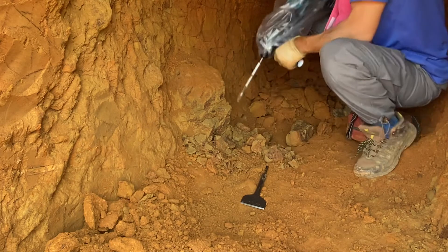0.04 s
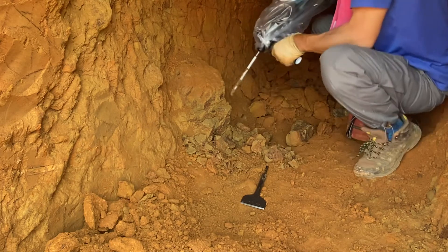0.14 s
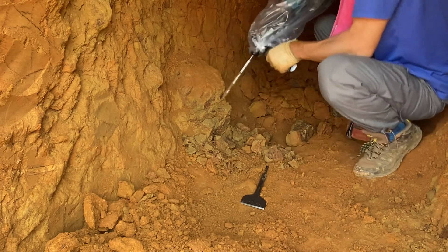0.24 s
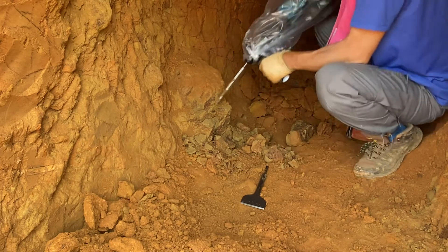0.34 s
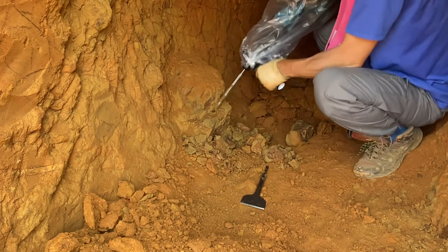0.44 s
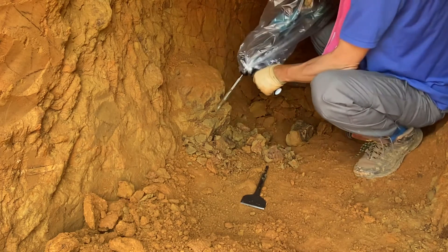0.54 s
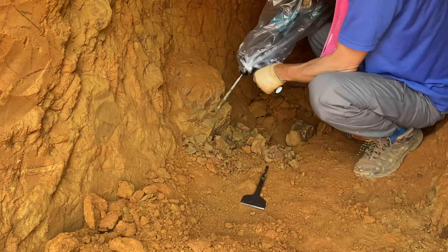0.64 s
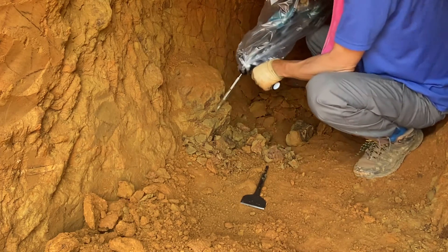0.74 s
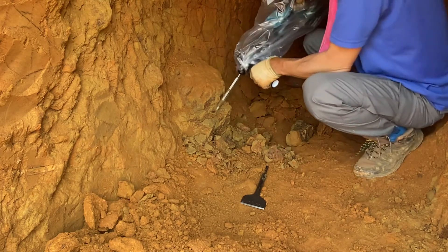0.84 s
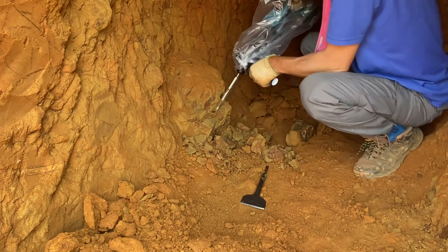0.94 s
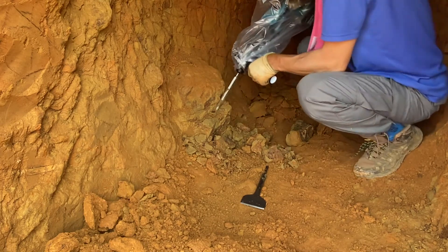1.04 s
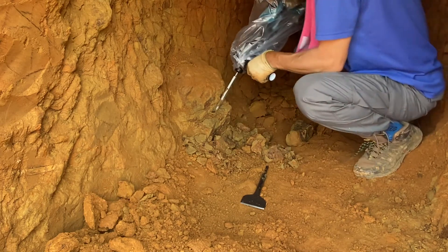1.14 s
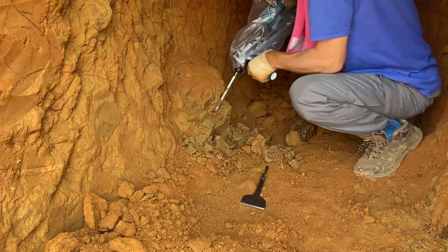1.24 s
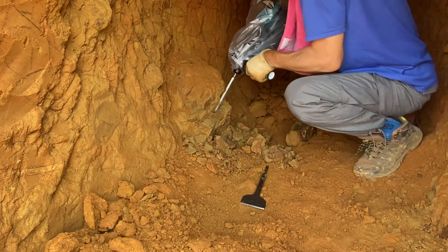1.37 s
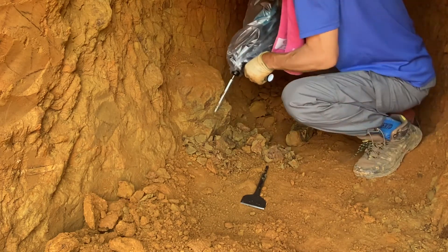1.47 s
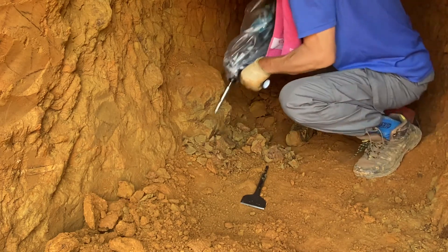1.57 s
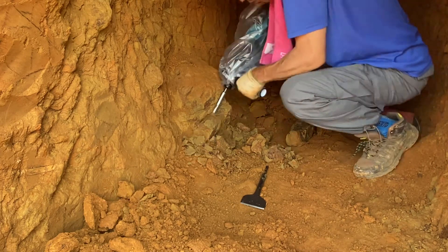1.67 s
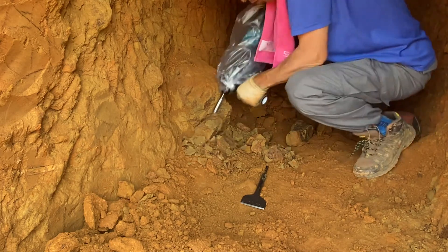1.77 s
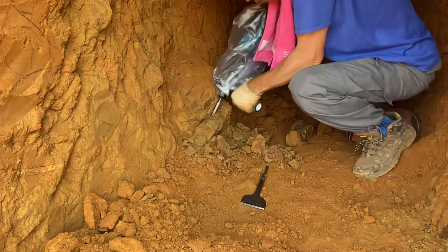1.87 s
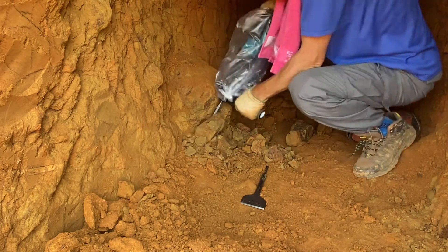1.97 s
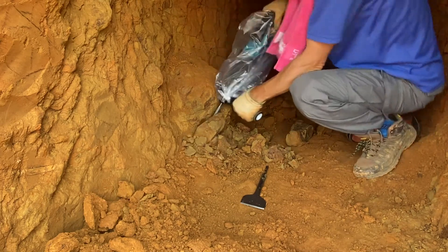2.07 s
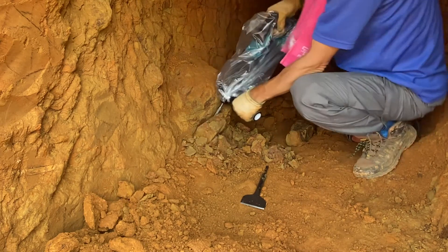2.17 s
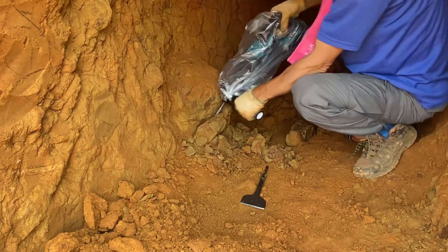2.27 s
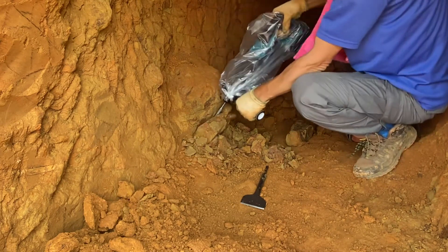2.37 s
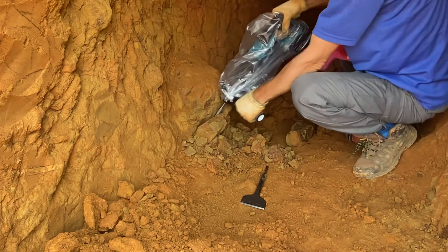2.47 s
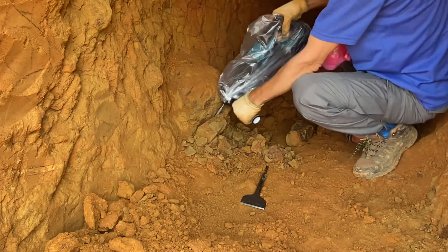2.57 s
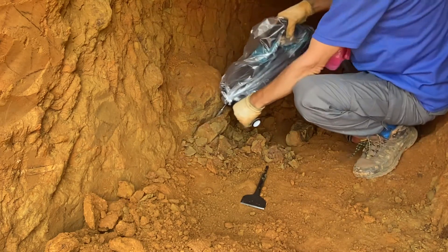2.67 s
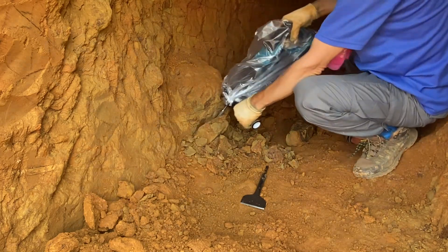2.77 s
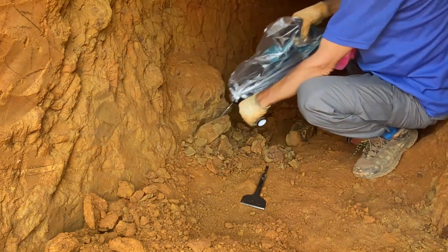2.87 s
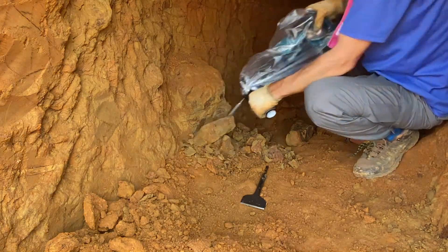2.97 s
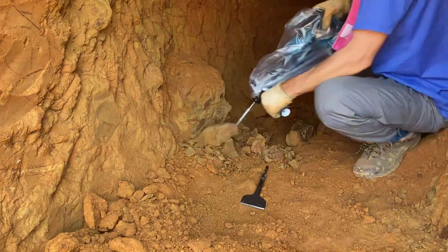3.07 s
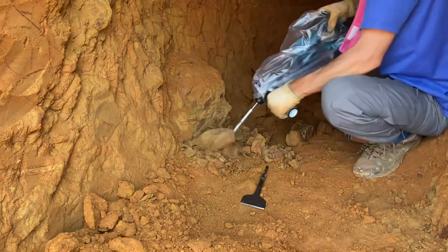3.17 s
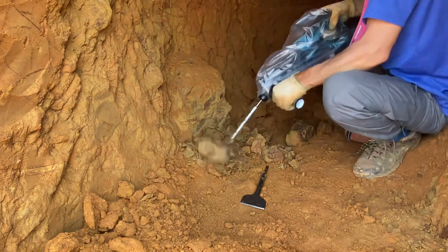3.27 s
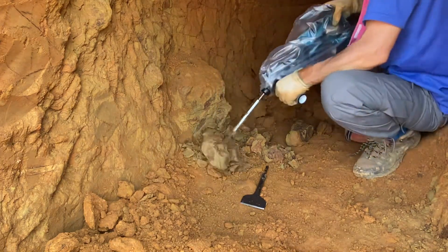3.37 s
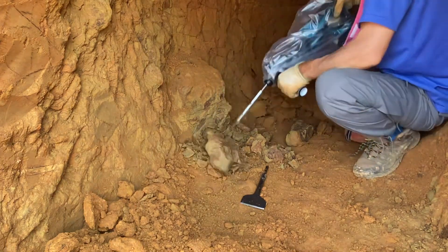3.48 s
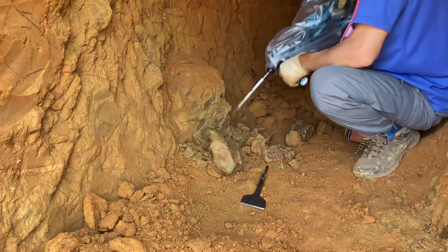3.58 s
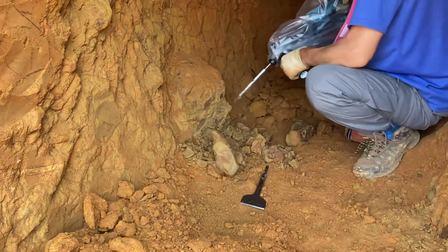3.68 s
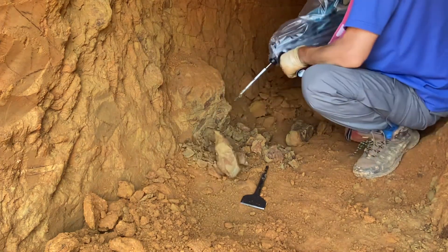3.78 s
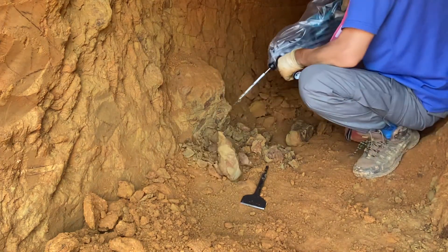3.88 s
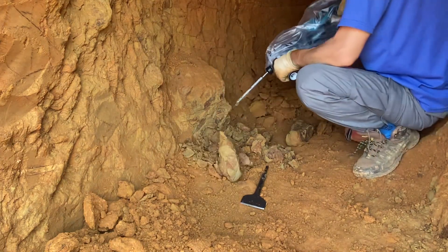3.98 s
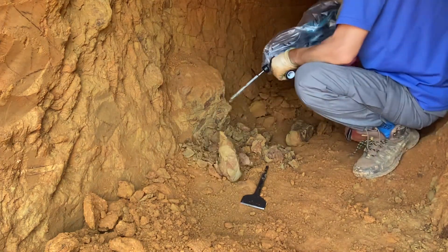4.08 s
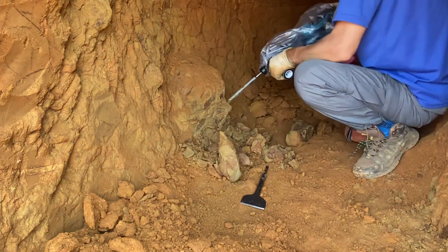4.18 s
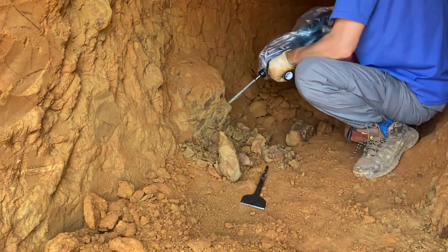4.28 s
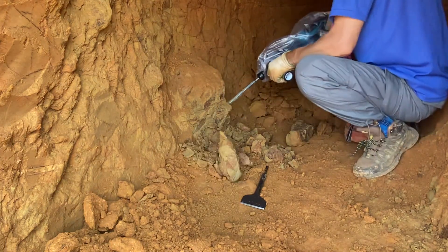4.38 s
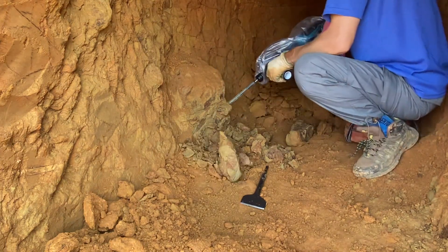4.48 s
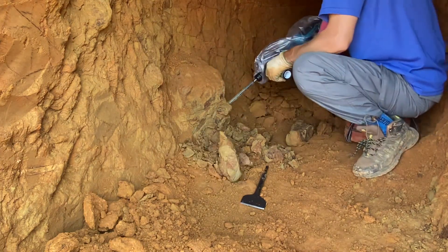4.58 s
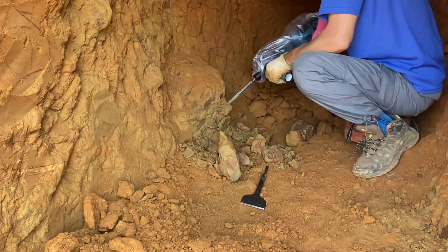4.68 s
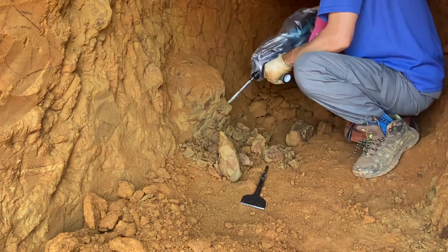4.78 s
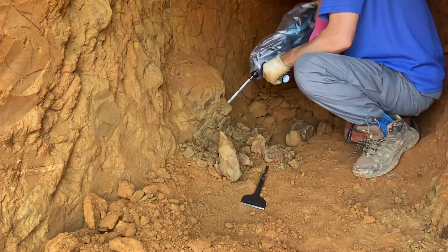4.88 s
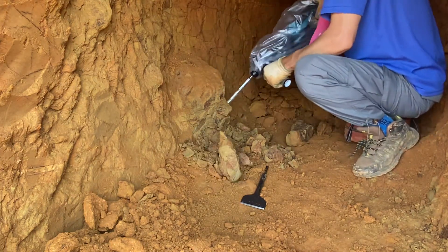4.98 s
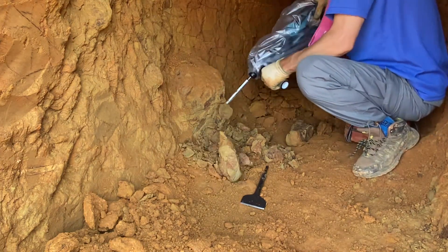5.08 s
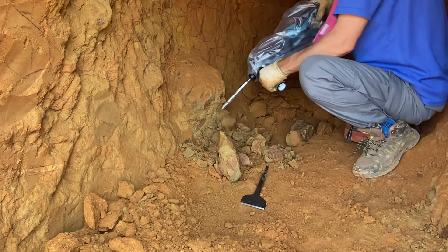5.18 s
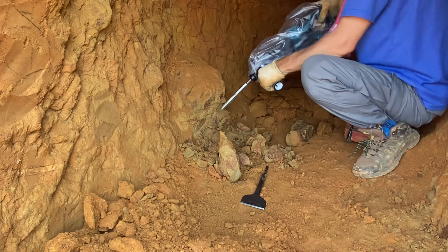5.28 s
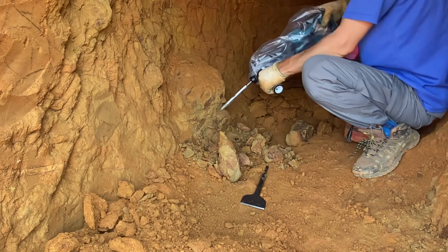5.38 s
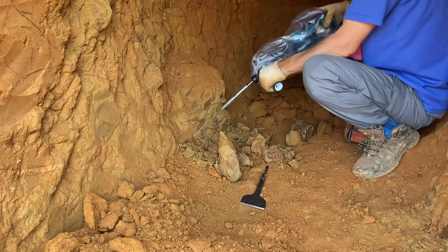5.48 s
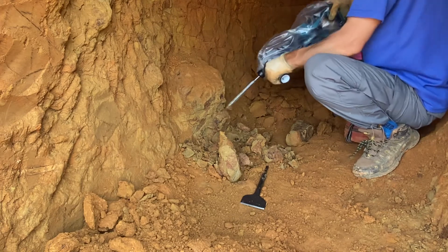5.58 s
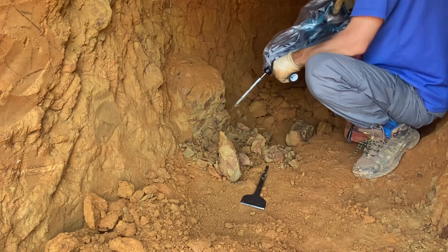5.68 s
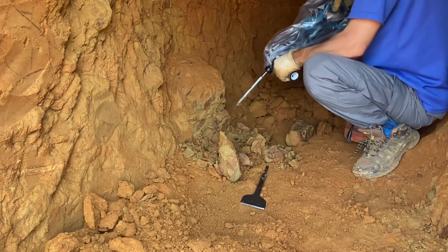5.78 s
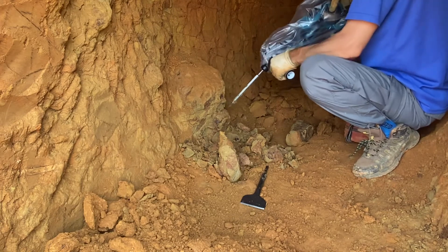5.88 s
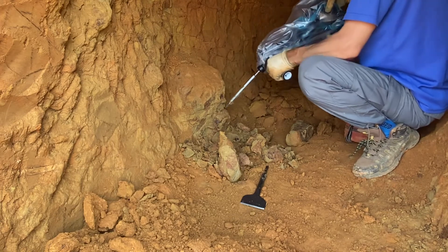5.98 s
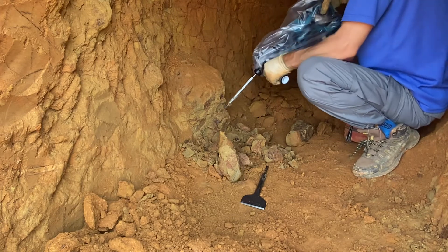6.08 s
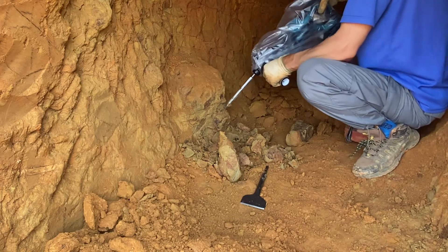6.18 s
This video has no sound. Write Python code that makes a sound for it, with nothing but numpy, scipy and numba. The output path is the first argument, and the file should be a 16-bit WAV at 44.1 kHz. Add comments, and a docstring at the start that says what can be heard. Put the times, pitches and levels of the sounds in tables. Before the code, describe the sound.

Close, dry machine-gun hammering from a power chisel, a pause of crinkling wrap and a thudding earth clod, then a shorter hammering burst.

```python
"""Hammer drill in a small earth cave

A cordless hammer drill wrapped in plastic chisels into clay in two bursts. Piston blows excite casing
resonances, noise grains give the crushed clay, and a narrow, flickering hiss near 13 kHz follows the blows.
Around the bursts the wrap rustles, decaying tones and noise knock as tip and stones, and a clod tumbles as
a low noise swell. Two close microphone ports hear it; a second, independent draw widens the sound."""
import sys
import numpy as np
from scipy import signal
from scipy.fft import rfft, irfft, next_fast_len
from scipy.io import wavfile
from scipy.ndimage import uniform_filter1d
from numba import njit

SR = 44100
rng = np.random.default_rng(int(sys.argv[2]) if len(sys.argv) > 2 else 0)


def master_out(mix):
    """Clip the mix to full scale and print it as 16-bit PCM to the path in sys.argv[1]."""
    frames = np.transpose(np.atleast_2d(mix))
    ceiling = np.clip(frames, -1, 1)
    pcm = np.round(ceiling * 32767).astype(np.int16)
    wavfile.write(sys.argv[1], SR, pcm)


N = 274743
T = np.arange(N) / SR
SIZE = next_fast_len(N + SR)  # transform length, padded so that filter tails do not wrap round
HZ = np.maximum(np.arange(SIZE // 2 + 1) * SR / SIZE, 1)

# Murmur of air in the cave. Each row: frequency in Hz, gain in dB.
AIR_SPECTRUM = [(15, -39), (25, -11), (64, 9.5), (120, -8), (796, -30), (2280, -28), (7920, -28),
                (9070, -37), (10700, -27), (16000, -26.5)]
AIR_DB = -70

# Movements that crinkle the wrap and shift cloth and soil. Each row: peak in seconds, rise over 20 dB
# in seconds, fall over 20 dB in seconds, wrap level in dB, soil level in dB.
MOVEMENTS = [(0.02, 0.068, 0.39, -75, -72), (0.18, 0.076, 0.24, -70.5, -89),
             (0.246, 0.021, 0.039, -61.5, -80), (0.466, 0.0067, 0.1, -66, -48.5),
             (0.52, 0.031, .06, -73, -48.5), (0.72, 0.14, 0.14, -94, -67), (0.856, 0.078, 0.3, -56.5, -61),
             (0.98, 0.027, 0.09, -58, -60.5), (1.13, .2, 0.19, -71, -77.5), (2.64, .1, 0.05, -67.5, -83),
             (2.76, 0.24, .03, -66.5, -70), (2.8, 0.028, 0.04, -72, -54.5), (2.83, .05, 0.07, -61.5, -68),
             (2.95, .1, .2, -66, -80), (3.08, 0.17, 0.069, -66.5, -52), (3.25, 0.18, 0.16, -71, -68.5),
             (3.41, 0.22, 0.49, -65.5, -76), (3.76, .05, .2, -62.5, -69.5),
             (3.84, 0.11, 0.12, -49.5, -61.5), (4.01, 0.21, 0.17, -54.5, -61.5),
             (4.3, 0.29, .3, -70.5, -63), (4.4, .06, 0.034, -71, -52.5), (4.5, 0.18, 0.098, -68.5, -70.5),
             (4.565, .02, 0.1, -64.5, -65), (4.72, 0.32, 0.19, -64.5, -75.5),
             (4.8, 0.074, 0.24, -56.5, -63), (5.7, 0.11, 0.97, -63.5, -66.5),
             (5.97, 0.22, 0.11, -63.5, -74), (6.005, .006, 0.16, -65, -54.5),
             (6.064, .008, 0.063, -71.5, -52.5), (6.088, .01, .05, -69, -61), (6.16, 0.12, 0.18, -62, -75),
             (6.21, .03, 0.17, -51, -55.5)]
# Crinkling wrap and grit. Each row: frequency in Hz, gain in dB.
WRAP_SPECTRUM = [(1200, -9), (2500, -5), (6000, -10), (11000, -7), (14000, -13), (16000, -7.5)]
# Shuffling cloth and soil. Each row: frequency in Hz, gain in dB.
SOIL_SPECTRUM = [(120, 2.5), (300, 1.5), (900, 1), (2000, -8.5), (3500, -33.5)]
SOIL_GRAIN_DB = 3.2

# Knocks of tip, stones, clods and the first lone blows. Each row: start in seconds, level in dB,
# pitch in Hz, 60 dB decay time in seconds, level of the gritty crack in dB.
KNOCKS = [(0.041, -57, 243, 0.17, -95), (0.239, -70, 600, 0.063, -73), (0.465, -39, 2540, 0.16, -70),
          (0.475, -37, 810, 0.069, -70), (0.505, -36.5, 1055, 0.1, -77), (0.7, -56, 710, 0.063, -92),
          (0.708, -57, 276, 0.12, -99), (0.787, -56, 245, 0.12, -84), (0.984, -56.5, 339, .12, -83),
          (1.203, -47, 2200, 0.086, -58), (1.236, -34.5, 1150, 0.073, -44), (2.719, -66, 275, 0.1, -78),
          (2.796, -54, 447, 0.13, -63.5), (3.014, -48.5, 277, 0.1, -76), (3.029, -46.5, 253, 0.33, -84),
          (3.04, -52, 800, .15, -79.5), (3.06, -38, 350, 0.15, -76), (3.064, -47.5, 756, 0.15, -72),
          (3.079, -43.5, 246, 0.1, -80), (3.109, -52, 280, .11, -89), (3.239, -56, 238, 0.16, -93),
          (4.277, -55, 633, 0.12, -74.5), (4.36, -54, 817, 0.15, -75.5), (4.389, -59.5, 497, 0.12, -60.5),
          (4.559, -62.5, 2960, 0.14, -78), (4.891, -52, 2360, .075, -66), (4.922, -44.5, 1118, .09, -51),
          (6.002, -60.5, 546, 0.2, -63), (6.062, -53.5, 817, 0.16, -63), (6.084, -62, 309, 0.061, -60.5),
          (6.203, -57, 2970, 0.17, -51.5)]
KNOCK_WIDTH, KNOCK_TONE_DB = .2, -3.5  # width of the crumbly ring over its pitch; gain of the clear tone

# Motor speed, one list per burst. Each row: time in seconds, blows per second.
BLOW_RATE = [
    [(1.14, 45), (1.236, 51), (1.318, 64.4), (1.428, 74.1), (1.49, 77.9), (1.7, 78.6), (1.966, 78.9),
     (2.12, 61), (2.22, 58.8), (2.34, 52.5), (2.64, 52)],
    [(4.86, 51.4), (5.008, 62), (5.106, 74.3), (5.23, 77), (5.32, 75.7), (5.42, 78.2), (5.57, 55.8),
     (5.72, 52)],
]
# Loudness, one list per burst. Each row: time in seconds, mids in dB, treble in dB.
MID_TREBLE_LEVELS = [
    [(1.14, -83, -76), (1.248, -37.5, -48), (1.314, -25, -31.5), (1.494, -20.5, -26), (1.562, -23.5, -29),
     (1.92, -24, -33), (2.36, -29, -33.5), (2.484, -37.5, -52), (2.56, -56, -69), (2.64, -81, -72)],
    [(4.86, -78, -70), (4.922, -43, -53), (5.006, -26.5, -34.5), (5.156, -22.5, -30), (5.184, -26, -32),
     (5.408, -26, -33), (5.426, -29.5, -39.5), (5.522, -27.5, -42.5), (5.608, -44, -60.5), (5.72, -76, -72)],
]
# Loudness of the bass, one list per burst. Each row: time in seconds, level in dB.
BASS_LEVELS = [
    [(1.2, -69.5), (1.252, -61), (1.282, -45.5), (1.34, -34), (1.506, -30), (1.574, -40.5), (1.628, -33.5),
     (1.702, -39), (1.774, -40.5), (1.812, -35.5), (2.002, -34), (2.058, -34.5), (2.374, -44.5),
     (2.56, -69)],
    [(4.9, -64.5), (4.95, -63), (4.97, -46), (5.036, -34.5), (5.074, -36), (5.092, -37.5), (5.156, -33),
     (5.3, -33), (5.32, -38), (5.396, -37.5), (5.422, -46), (5.458, -52.5), (5.552, -48), (5.66, -69)],
]
# How loosely the bit sits. Each row: time in seconds, looseness from 0 to 1.
LOOSENESS = [(1.14, .9), (1.42, .4), (1.55, .42), (1.77, .58), (1.83, .27), (1.97, .27), (2.03, .58),
             (2.22, .62), (2.45, .85), (4.86, .9), (5.05, .55), (5.15, .45), (5.42, .6), (5.5, .85)]
# Resonance of a blow with the bit entering, buried, coasting and at the surface, one list for each.
# Each row: frequency in Hz, gain in dB.
STANCE_SPECTRA = [
    [(35, -36.5), (60, -6), (160, 1), (245, -3), (389, -7.5), (490, -10), (583, -9), (735, -3), (790, -0.5),
     (1100, -14.5), (1240, -5.5), (1500, -9), (2080, -4.5), (4580, -13), (6000, -14.5), (7800, -49.5),
     (13200, -120)],
    [(35, -40), (60, -15), (163, 1), (327, -7), (382, -26), (445, -1.5), (490, 5.5), (680, -17.5),
     (778, -7.5), (1500, -3.5), (1850, -10.5), (2890, -7.5), (3430, -16), (4000, -12), (6000, -18),
     (7800, -52.5), (13200, -120)],
    [(35, -37), (60, -9), (231, -6), (360, -7.5), (472, 3.5), (583, -3), (926, 1), (1210, -9), (1390, -2.5),
     (1710, -4), (2000, -10), (2520, -6), (4760, -11), (6000, -14.5), (7800, -44), (13200, -120)],
    [(35, -39.5), (60, -6), (143, -4), (214, 0), (303, -3), (396, -1.5), (472, -10.5), (642, -4.5),
     (1590, -5), (2080, -2.5), (2380, -2), (3370, -5.5), (3850, -8.5), (5550, -13), (6000, -16.5),
     (7800, -43.5), (13200, -120)],
]
# When the bit, entering at first, has settled as buried, coasting and at the surface, in seconds.
SETTLED_AT = [1.82, 2.09, 4.8]
SETTLE_S = .08
# Rattle of the casing. Each row: frequency in Hz, gain in dB.
RATTLE_SPECTRUM = [(59, -32.5), (100, -3), (232, -11.5), (401, -13), (444, -8), (670, -8.5), (1280, -2.5),
                   (1900, -10), (2780, -2), (6000, -8.5), (7800, -31.5), (13200, -120)]
# Casing modes that the rattle wakes now and then. Each row: mean frequency in Hz, width in Hz, mean level in dB.
CASING_MODES = [(570, 150, -3), (866, 270, -6), (1194, 170, -10.5), (1412, 43, -7.5), (1900, 130, -7),
                (2746, 60, -8.5)]
# Crushed clay. Each row: frequency in Hz, gain in dB.
CRUSH_SPECTRUM = [(3000, -21), (6000, -1.5), (8000, 0), (10000, -3.5), (12500, -3), (14000, -16.5),
                  (16000, -23.5)]
# Gear whine. Each row: teeth passing per blow, width in Hz, mean level over the crushed clay in dB.
GEAR_MESHES = [(102.8, 40, 1.5), (77.3, 160, -9.5), (25.8, 110, -1)]
GEAR_FLICKER_DB = 4.5
STUMBLE = .12  # share by which a loose bit upsets the beat
BLOW_OVER_CLATTER_DB = 3
# A narrow hiss follows the blows; drift is a share of its centre, the fade adds in as the bit loosens.
HISS_HZ, HISS_DRIFT, HISS_WIDTH_HZ = 12860, .008, 450
HISS_OVER_MIDS_DB, HISS_FLICKER_DB, HISS_LOOSE_DB = -2, 5.5, -25

# A low hum lingers as the motor stops; rise and fall each span 20 dB.
HUM_HZ, HUM_WIDTH_HZ = 152, 5.0
HUM_S, HUM_RISE_S, HUM_FALL_S, HUM_DB = 2.36, .15, .28, -46
# The clod lands.
THUD_S, THUD_RISE_S, THUD_FALL_S, THUD_DB = 3.08, .087, .076, -41

# The two ports. Each row: frequency in Hz, common share of the power from 0 to 1, phase by which the right
# leads in radians, left minus right in dB.
PORT_PAIR = [(20, .99, 0, 3), (130, 1, .2, 2.8), (300, .96, .5, 1.5), (600, .85, 1, 1), (1400, .75, 1, .5),
             (2300, .72, -1, 2.5), (4000, .78, .3, 2.5), (5400, .62, 0, 2), (6800, .97, 0, .5),
             (8900, 1, 3.14, 0), (11200, 1, 6.28, 0), (12700, 1, 9.2, 0), (13600, 1, 9.6, 0),
             (17000, 1, 14.5, 0)]
TOP_HZ = 15900


def undb(db):
    """Logarithmic measure: decibels to amplitude gain."""
    return 10 ** (np.asarray(db) / 20)


def unit(x):
    """Normalization: scale to rms 1."""
    return x / np.sqrt(np.mean(x ** 2))


def curves(*tables):
    """Linear interpolation: columns of the joined tables at every sample."""
    s, *columns = np.concatenate(tables).T
    return [np.interp(T, s, column) for column in columns]


def during(*tables):
    """Gating: 1 while any table runs, with ends softened by a moving mean."""
    running = sum((T > table[0][0]) & (T < table[-1][0]) for table in tables)
    return uniform_filter1d(running * 1., size=600)


def swell(s, rise, fall):
    """Exponential growth and decay: gain climbs 20 dB in rise s to its peak at s, sinks 20 dB in fall s."""
    return undb(-20 * np.maximum((s - T) / max(rise, .002), (T - s) / max(fall, .002)))


def colour(x, shape, size=16384):
    """Minimum phase: a causal filter with the gain of the (Hz, dB) points, built from the cepstrum."""
    f, db = np.transpose(shape)
    hz = np.maximum(np.arange(size // 2 + 1) * SR / size, 1)
    log_gain = np.interp(np.log(hz), np.log(f), db) * np.log(10) / 20
    cepstrum = irfft(log_gain)
    # folding the negative half onto the positive makes the response causal
    cepstrum[1:size // 2] *= 2
    cepstrum[size // 2 + 1:] = 0
    response = irfft(np.exp(rfft(cepstrum)))
    return irfft(rfft(x, SIZE) * rfft(response, SIZE), SIZE)[:N]


def split(x, hz, kind):
    """Band division: the steep low or high part."""
    return signal.sosfilt(signal.butter(4, hz, kind, fs=SR, output="sos"), x)


def walk(rate):
    """Slow random fluctuation: levels held 1 / rate s and slewed, with spread near 1."""
    held = int(SR / rate)
    levels = np.repeat(rng.standard_normal(N // held + 1), held)[:N]
    return uniform_filter1d(levels, held // 2 + 1)


def grains(spread_db, rate):
    """Granular noise: uneven particles modulate the level of white noise."""
    return rng.standard_normal(N) * undb(spread_db * walk(rate))


@njit
def ring(x, hz, width):
    """Damped resonance: a state-variable band-pass whose centre may move."""
    y, band, low = np.empty(len(x)), 0., 0.
    for i in range(len(x)):
        g, damping = np.tan(np.pi * hz[i] / SR), width / hz[i]
        v = (band + g * (x[i] - low)) / (1 + g * (g + damping))
        band, low, y[i] = 2 * v - band, low + 2 * g * v, damping * v
    return y


def air():
    """Broadband background: the low murmur of air in the cave is filtered noise of flickering level."""
    return undb(AIR_DB + 2.5 * walk(14)) * unit(colour(rng.standard_normal(N), AIR_SPECTRUM))


def rustle():
    """Granular friction: crinkling wrap and grit above, shuffling cloth and soil below."""
    wrap = unit(colour(grains(1.2, 150), WRAP_SPECTRUM))
    soil = unit(colour(grains(SOIL_GRAIN_DB, 60), SOIL_SPECTRUM))
    # independent movements add in power
    power = sum((swell(s, rise, fall) * undb([[wrap_db], [soil_db]])) ** 2
                for s, rise, fall, wrap_db, soil_db in MOVEMENTS)
    wrap_gain, soil_gain = np.sqrt(power)
    return wrap_gain * wrap + soil_gain * soil


def knocks():
    """Impact and exponential decay: a tone inside a dull, crumbly ring, and a gritty crack."""
    length = 8192
    out, t = np.zeros(N + length), np.arange(length) / SR
    grit_band = signal.butter(2, (1200, 6000), "band", fs=SR, output="sos")
    grit = unit(signal.sosfilt(grit_band, grains(3.2, 270)))
    for s, db, hz, t60, crack_db in KNOCKS:
        i = int(s * SR)
        attack = np.minimum(t / .00029, 1)
        fade = 1000 ** (-t / t60) * attack
        dull = unit(ring(rng.standard_normal(length), hz + 0 * t, KNOCK_WIDTH * hz))
        tone = undb(KNOCK_TONE_DB) * np.sin(2 * np.pi * hz * t)
        crack = undb(crack_db) * np.roll(grit, -i)[:length]
        out[i:i + length] += fade * (undb(db) * (dull + tone) + crack)
    return out[:N]


def clatter(turns, slip_rate, ragged_db=3.2, count=90, size=2048):
    """Periodic excitation: one cycle of casing knocks repeats per blow; a looser bit changes it faster."""
    rows = int(turns[-1]) + 1
    slip = np.interp(np.arange(rows), turns, slip_rate)[:, None] * rng.standard_normal((rows, count))
    slip *= .7 + np.arange(count) / 18  # high partials lose step first
    slip[0] = 2 * np.pi * rng.random(count)
    # single partials swell and sink over a few blows
    drift = np.sqrt(7) * uniform_filter1d(rng.standard_normal((rows, count)), size=7, axis=0)
    partials = undb(ragged_db * drift) * np.exp(1j * np.cumsum(slip, axis=0))
    cycles = irfft(partials, size, axis=1)
    return cycles[turns.astype(int), (turns % 1 * size).astype(int)]


def blow_body(blows, flare, turns, loose):
    """Source and filter: blows and clatter drive resonances that cross-fade as the bit changes stance."""
    low = undb(BLOW_OVER_CLATTER_DB) * split(blows, 600, "low")
    high = split(unit(flare * clatter(turns, 1.2 * loose ** 2)), 600, "high")
    push = low + high
    stance = sum(np.clip(1 + (T - s) / SETTLE_S, 0, 1) for s in SETTLED_AT)
    return sum(np.clip(1 - abs(stance - k), 0, 1) * unit(colour(push, spectrum))
               for k, spectrum in enumerate(STANCE_SPECTRA))


def casing_rattle(flare):
    """Modal excitation: shaking noise wakes casing modes of wandering pitch and level."""
    shake = flare * grains(2.0, 300)
    modes = 0
    for hz, width, db in CASING_MODES:
        mode = ring(shake, hz * (1 + .051 * walk(5)), 1. * width)
        modes = modes + undb(db + 2.2 * walk(14)) * unit(mode)
    return unit(unit(colour(shake, RATTLE_SPECTRUM)) + modes)


def crushed_clay(strength, since):
    """Fracture noise: grains of crushed clay flare after each blow and die away."""
    return unit(colour(strength * (.5 + np.exp(-since / .011)) * grains(2.9, 500), CRUSH_SPECTRUM))


def gear_whine(rate):
    """Tooth-mesh frequency: narrow noise bands follow the motor speed, flickering in level."""
    whine = 0
    for teeth, width, db in GEAR_MESHES:
        mesh = unit(ring(rng.standard_normal(N), teeth * rate, 1. * width))
        whine = whine + undb(db + GEAR_FLICKER_DB * walk(7)) * mesh
    return whine


def high_hiss(strength, since, mid_db, loose):
    """Narrow-band noise: a flickering hiss near 13 kHz follows the blows, fading as the bit loosens."""
    hz = HISS_HZ * (1 + HISS_DRIFT * walk(14))
    loose_db = HISS_LOOSE_DB * np.clip((loose - .58) / .2, 0, 1)
    db = mid_db + HISS_OVER_MIDS_DB + HISS_FLICKER_DB * walk(16) + loose_db
    pulsed = strength * (.26 + np.exp(-since / .0015)) * rng.standard_normal(N)
    narrow = ring(pulsed, hz, 1. * HISS_WIDTH_HZ)
    return undb(db) * unit(ring(narrow, hz, 2. * HISS_WIDTH_HZ))


def drill():
    """Forced vibration: piston blows time the body, rattle, crushed clay and hiss; gears whine along."""
    rate, = curves(*BLOW_RATE)
    mid_db, treble_db = curves(*MID_TREBLE_LEVELS)
    bass_db, = curves(*BASS_LEVELS)
    loose = np.clip(curves(LOOSENESS)[0], 0, 1)
    turns = np.cumsum(rate * (1 + STUMBLE * loose ** 4 * walk(40))) / SR
    count = turns.astype(int)
    since = (turns - count) / rate  # seconds since the last blow
    # the looser the bit, the less equal the blows
    strength = undb((-.6 + 2.7 * loose) * rng.standard_normal(count[-1] + 1)[count])
    blows = unit(strength * (np.diff(count, prepend=0) > 0))
    # a firm bit sounds on between blows; a loose one mostly flares after each
    flare = strength * (.4 + 1.2 * (1 - loose) + np.exp(-since / .005))

    body = blow_body(blows, flare, turns, loose)
    rattle = casing_rattle(flare)
    # the bass stays even longer than the mids, which a loose bit scatters
    bass = np.sqrt(1 - .5 * loose) * unit(split(body, 420, "low"))
    bass += np.sqrt(.46 * loose) * unit(split(rattle, 420, "low"))
    mids = np.sqrt(1 - loose ** 2) * unit(split(body, 470, "high"))
    mids += loose * unit(split(rattle, 730, "high"))
    treble = crushed_clay(strength, since) + (1 - loose) ** 2 * gear_whine(rate)
    tool = undb(mid_db) * mids + undb(bass_db) * bass + undb(treble_db) * treble
    return during(*MID_TREBLE_LEVELS) * (tool + high_hiss(strength, since, mid_db, loose))


def hum():
    """Narrow-band resonance: noise through a sharp band-pass lingers as the motor stops."""
    tone = unit(ring(rng.standard_normal(N), HUM_HZ + 0 * T, HUM_WIDTH_HZ))
    return undb(HUM_DB) * swell(HUM_S, HUM_RISE_S, HUM_FALL_S) * tone


def thud():
    """Damped impact: a heavy clod rolls over and lands on loose soil, a swell of low noise."""
    low = colour(grains(2.1, 60), [(20, -17), (60, 16.5), (110, 7), (250, 4.5), (600, -47)])
    return undb(THUD_DB) * swell(THUD_S, THUD_RISE_S, THUD_FALL_S) * unit(low)


def sources():
    """Superposition: air, handling, knocks, drill and clod, with fresh chance at each call."""
    return air() + rustle() + knocks() + drill() + thud()


def ports(common, wide):
    """Coherence of two channels: a second, independent draw in opposite sign widens the sound."""
    f, *columns = np.transpose(PORT_PAIR)
    alike, lead, pan_db = (np.interp(HZ, f, column) for column in columns)
    alike = np.clip(alike, 0, 1)
    side = np.array([[1], [-1]])  # left, right
    same = np.sqrt(alike) * rfft(common, SIZE)
    opposite = side * np.sqrt(1 - alike) * rfft(wide, SIZE)
    shift = np.exp(-.5j * side * lead) * undb(side * pan_db / 2)
    return irfft((same + opposite) * shift, SIZE)[:, :N]


def scene():
    """Partial coherence: the sources with the hum in common, and an independent draw for the width."""
    return ports(sources() + hum(), sources())


def record(dry):
    """Band limitation: the recorder cuts the top with a steep elliptic low-pass."""
    return signal.sosfilt(signal.ellip(10, .2, 80, TOP_HZ, fs=SR, output="sos"), dry)


dry = scene()
out = record(dry)
master_out(out)
```